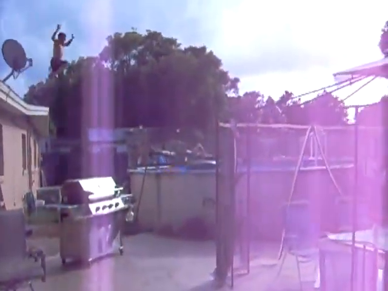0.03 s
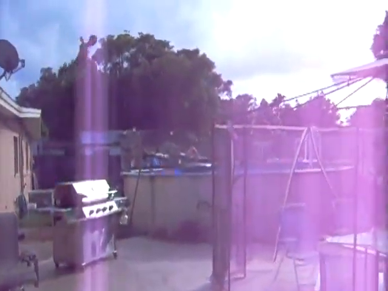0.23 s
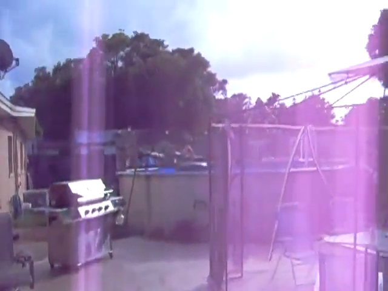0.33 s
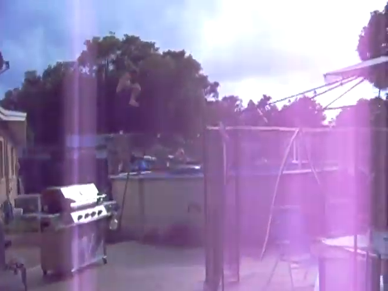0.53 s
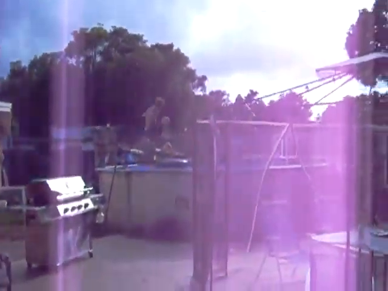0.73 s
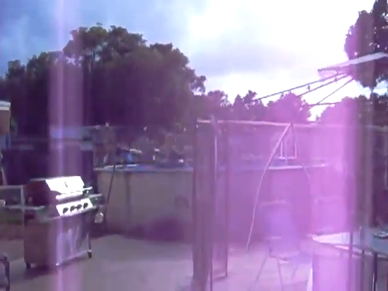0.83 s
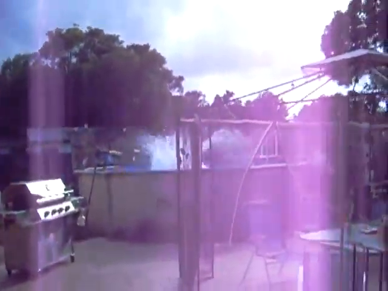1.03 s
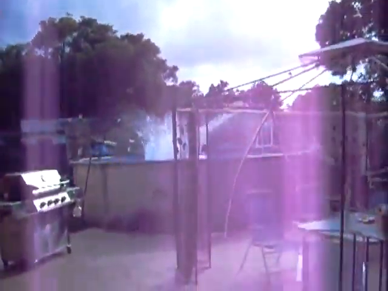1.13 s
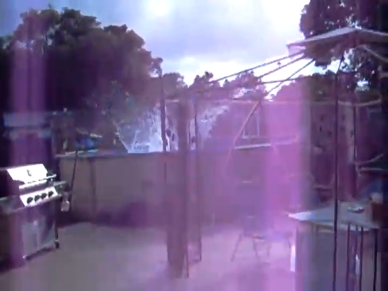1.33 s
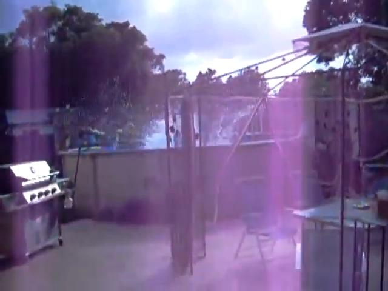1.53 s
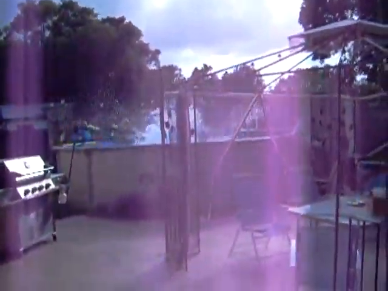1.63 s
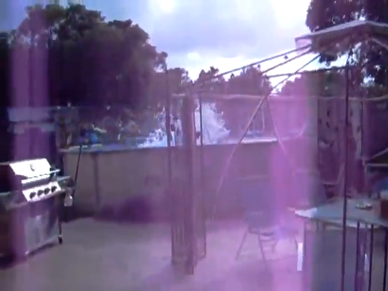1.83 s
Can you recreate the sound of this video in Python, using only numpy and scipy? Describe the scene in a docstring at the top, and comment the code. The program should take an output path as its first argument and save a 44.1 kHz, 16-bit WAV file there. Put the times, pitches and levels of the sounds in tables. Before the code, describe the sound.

Someone lands in a backyard pool with a smack, followed by pattering, churning water.

```python
"""A body hits a backyard pool after a jump from the roof, some metres from the microphone.
It smacks the surface, the air pocket behind it slams shut and throws up spray, then the water
rains back and churns, with dull echoes off the house and fence. Close up, wind bumps the
microphone, over a steady outdoor hiss and the recorder's thin whine."""
import sys
import numpy as np
from scipy import signal
from scipy.fft import rfft, irfft, next_fast_len
from scipy.io import wavfile
from scipy.ndimage import uniform_filter1d

SR = 44100
rng = np.random.default_rng(int(sys.argv[2]) if len(sys.argv) > 2 else 0)


def dump(signal):
    """Clip the signal to [-1, 1] and save it as 16-bit WAV at the path in sys.argv[1]."""
    limited = np.clip(np.atleast_2d(signal).T, -1, 1)
    pcm = np.round(limited * 32767).astype(np.int16)
    wavfile.write(sys.argv[1], SR, pcm)


N = 83790


def from_db(db):
    return 10 ** (np.asarray(db) / 20)


def unit_rms(x):
    return x / np.sqrt(np.mean(x ** 2) + 1e-20)


def seconds():
    return np.arange(N) / SR


def db_at_hz(spectrum, hz):
    """A spectrum read on a log-frequency axis."""
    corner_hz, db = np.transpose(spectrum)
    return np.interp(np.log(np.maximum(hz, 1)), np.log(corner_hz), db)


def colour(x, spectrum):
    """Causal (minimum-phase) filter with the shape of the spectrum; the result has rms 1."""
    size = next_fast_len(N, real=True) * 2
    bin_hz = np.arange(size // 2 + 1) * SR / size
    cepstrum = irfft(np.log(from_db(db_at_hz(spectrum, bin_hz))))
    cepstrum[1:size // 2] *= 2
    cepstrum[size // 2 + 1:] = 0
    response = np.exp(rfft(cepstrum))
    return unit_rms(irfft(rfft(x, size) * response)[:N])


def noise(spectrum):
    return colour(rng.standard_normal(N), spectrum)


def low_pass(x, hz):
    return signal.sosfilt(signal.butter(2, hz, fs=SR, output="sos"), x + 1e-18)


def wander(hz):
    """Random drift, mostly slower than hz; rms 1."""
    return unit_rms(low_pass(rng.standard_normal(N), hz))


def ring(clicks, hz, t60_s):
    """A unit click sets a sine of height 1 ringing."""
    decay, step = from_db(-60 / (t60_s * SR)), 2 * np.pi * hz / SR
    return signal.lfilter([0, np.sin(step)], [1, -2 * decay * np.cos(step), decay ** 2], clicks + 1e-18)


def swell(start_s, attack_s, t60_s):
    """A straight rise, then an exponential fall."""
    age = np.maximum(seconds() - start_s, 0)
    return np.minimum(age / attack_s, 1) * from_db(-60 * age / t60_s)


def evened(x, window_s):
    """Keeps the fine grain and holds the slow level at 1."""
    size = int(window_s * SR)
    power = uniform_filter1d(uniform_filter1d(x * x, size), size)
    return x / np.sqrt(np.abs(power) + 1e-9)


def grains(per_s, spread_db):
    """Random clicks, many small and a few large."""
    sizes = from_db(spread_db * np.minimum(rng.exponential(1, N), 4))
    signs = rng.choice([-1, 1], N)
    return sizes * signs * (rng.random(N) < per_s / SR)


def bubbles(spectrum, per_s, pitch_count=72, t60_cycles=43):
    """A steady cloud of bubbles of many sizes; the small, high ones die soonest."""
    births = grains(per_s, spread_db=3)
    pitch_index = rng.integers(0, pitch_count, N)
    cloud = np.zeros(N)
    for k, hz in enumerate(np.geomspace(spectrum[0][0], spectrum[-1][0], pitch_count)):
        gain = from_db(db_at_hz(spectrum, hz)) * hz
        cloud += gain * ring(births * (pitch_index == k), hz, t60_cycles / hz)
    return evened(cloud, window_s=0.03)


# Spectrum of the backyard's air and hiss: frequency_hz, relative_density_db
AIR_SPECTRUM = [(30, -1), (120, 0.5), (250, -4.5), (450, -8.5), (850, -12), (1500, -21.5), (3400, -24),
                (5300, -22.5), (6100, -10.5), (6600, -19), (7300, -13.5), (8000, -20), (9000, -24),
                (10000, -34), (11000, -40)]
def outdoor_air(level_db=-42.5):
    """The steady bed of the yard: a low wash with a thin hiss on top."""
    return from_db(level_db) * noise(AIR_SPECTRUM)


def recorder_whine(pitch_hz=7417.6, level_db=-44.5, waver_db=0.82):
    """The recorder's own high tone, wavering slightly in level."""
    amplitude = np.sqrt(2) * from_db(level_db + waver_db * wander(hz=12))
    return amplitude * np.sin(2 * np.pi * pitch_hz * seconds())


# Light breeze on the microphone: time_s, level_db
BREEZE_LEVELS = [(0, -40.5), (1.35, -40.5), (1.5, -45.5), (1.9, -44.5)]
# Gusts bumping the microphone: peak_s, half_width_s, rumble_db, flutter_db
MIC_GUSTS = [(.208, 0.01, -34.5, -47), (0.298, 0.026, -30, -47), (.38, .011, -32, -33.5),
             (.51, 0.0076, -30.5, -38), (.548, 0.014, -27, -43.5), (.595, 0.021, -31.5, -43),
             (0.681, .011, -27, -33.5), (0.742, 0.021, -27, -40.5), (0.797, .016, -26, -28),
             (0.896, .01, -32, -47), (0.961, .015, -36.5, -58), (1.08, 0.022, -33, -47),
             (1.255, .018, -30, -42), (1.318, 0.014, -28, -35.5), (1.389, 0.025, -29, -41.5)]
# Deep buffeting at the microphone: frequency_hz, relative_density_db
RUMBLE_SPECTRUM = [(12, -8.5), (30, 1.5), (60, 2), (120, -7), (200, -15.5), (320, -25.5), (700, -38),
                   (2000, -61)]
# The higher flutter of a hard gust: frequency_hz, relative_density_db
FLUTTER_SPECTRUM = [(60, -9), (110, -1), (160, 2), (240, -8.5), (400, -15), (800, -29), (2000, -51)]
def wind_on_microphone():
    """Short bell-shaped gusts over a light breeze, each with a deep rumble and a higher flutter."""
    t = seconds()
    rumble_power = from_db(np.interp(t, *np.transpose(BREEZE_LEVELS))) ** 2
    flutter_power = np.zeros(N)
    for peak_s, half_width_s, rumble_db, flutter_db in MIC_GUSTS:
        bell = np.exp(-((t - peak_s) / half_width_s) ** 2)
        rumble_power += from_db(rumble_db) ** 2 * bell
        flutter_power += from_db(flutter_db) ** 2 * bell
    rumble = np.sqrt(rumble_power) * evened(noise(RUMBLE_SPECTRUM), window_s=0.027)
    flutter = np.sqrt(flutter_power) * evened(noise(FLUTTER_SPECTRUM), window_s=0.015)
    return rumble + flutter


# Echoes off the house and fence: delay_s, gain_db
YARD_ECHOES = [(.033, -17.5), (.065, -14), (.092, -22), (.135, -20)]
def yard(direct):
    """The direct sound reaches the microphone first, then a few dull echoes."""
    t, dull = seconds(), low_pass(direct, hz=3700)
    echoes = sum(from_db(db) * np.interp(t - delay_s, t, dull, left=0) for delay_s, db in YARD_ECHOES)
    return direct + echoes


# Single bubbles that ring out of the wash: start_s, pitch_hz, level_db, t60_s
BUBBLE_NOTES = [(1.014, 248, -24, .12), (1.022, 566.7, -25, 0.24), (1.024, 638.5, -27.5, .3),
                (1.022, 779.7, -25, 0.19), (1.023, 1073, -31, 0.16), (1.098, 162, -27.5, 0.23),
                (1.52, 2540, -36.5, 0.087), (1.54, 496, -38, 0.38), (1.545, 664.6, -36.5, 0.31),
                (1.612, 6600, -37, .1), (1.815, 2850, -44, .1)]
def lone_bubbles(rise_per_s=0.21, wobble_depth=0.008):
    """Each rings one note that wobbles as it is jostled and rises a little as it nears the surface."""
    notes = np.zeros(N)
    for start_s, pitch_hz, level_db, t60_s in BUBBLE_NOTES:
        age = np.maximum(seconds() - start_s, 0)
        glide_hz = pitch_hz * (1 + rise_per_s * age + wobble_depth * wander(hz=70))
        phase = 2 * np.pi * np.cumsum(glide_hz * (age > 0)) / SR
        notes += from_db(level_db) * swell(start_s, attack_s=0.0082, t60_s=t60_s) * np.sin(phase)
    return notes


# Water falling back on the pool: time_s, churn_db, patter_db
FALLING_LEVELS = [(1.05, -61, -63), (1.2, -45, -58), (1.25, -38.5, -47.5), (1.29, -44, -48),
                  (1.39, -35, -43.5), (1.47, -43, -44), (1.56, -38.5, -41), (1.65, -41.5, -41),
                  (1.82, -45.5, -41.5), (1.9, -44.5, -42.5)]
# Bubbles in the churn: pitch_hz, relative_level_db
CHURN_SPECTRUM = [(140, -4), (190, -4), (255, -1.5), (300, -13), (350, -1.5), (410, -12), (510, 3),
                  (680, 1.5), (900, -10), (1100, -8.5), (1400, -20)]
# Drops pattering on the surface: frequency_hz, relative_density_db
PATTER_SPECTRUM = [(200, -6), (600, 3.5), (1300, 1), (2100, -3), (3200, 0), (3900, -5), (5200, -1.5),
                   (6200, 1.5), (7600, 1), (9000, -5), (11000, -14)]
def falling_water():
    """Thrown water lands: lumps make bubbles, drops patter."""
    time_s, churn_db, patter_db = np.transpose(FALLING_LEVELS)
    churn_gain = from_db(np.interp(seconds(), time_s, churn_db))
    patter_gain = from_db(np.interp(seconds(), time_s, patter_db))
    churn = bubbles(CHURN_SPECTRUM, per_s=1400)
    patter = colour(grains(per_s=4500, spread_db=2), PATTER_SPECTRUM)
    return churn_gain * churn + patter_gain * patter


# The first jet out of the pool: frequency_hz, relative_density_db
JET_SPECTRUM = [(500, -13), (1200, -4), (2000, -5), (3100, -3), (4000, -10), (5200, -6), (6150, 6.5),
                (7200, -2), (8700, -2), (11000, -13.5)]
# The sheet of spray above the pool: frequency_hz, relative_density_db
SPRAY_SPECTRUM = [(400, -14), (1200, -2.5), (1900, -4.5), (2400, -5.5), (3100, 0), (3900, -5.5), (4800, 0),
                  (5300, -3), (6150, 4), (7200, -2), (8700, -3.5), (9900, -14), (11000, -18)]
# Bubbles from the closing pocket: pitch_hz, relative_level_db
GULP_SPECTRUM = [(250, -2), (440, -15), (540, -7), (650, 4), (800, 4.5), (930, -10.5), (1120, -3.5),
                 (1500, -18)]
# The body's deep push under water: frequency_hz, relative_density_db
PLUNGE_SPECTRUM = [(30, 1), (80, -1), (170, -1.5), (260, -1.5), (350, -2), (500, -16.5), (2000, -62)]
def air_pocket_burst(start_s=1.022, attack_s=0.0034):
    """The air pocket slams shut: a brief jet, a sheet of spray, a gulp of bubbles and a deep push."""
    def fading(level_db, t60_s):
        return from_db(level_db) * swell(start_s, attack_s, t60_s)
    jet = noise(JET_SPECTRUM) * fading(level_db=-20, t60_s=0.078)
    drops = grains(per_s=14000, spread_db=3.5)
    spray = colour(drops, SPRAY_SPECTRUM) * fading(level_db=-27.5, t60_s=0.6)
    gulp = bubbles(GULP_SPECTRUM, per_s=2500) * fading(level_db=-27, t60_s=0.53)
    plunge = evened(noise(PLUNGE_SPECTRUM), window_s=0.048) * fading(level_db=-34.5, t60_s=1.0)
    return jet + spray + gulp + plunge


# Sharp thuds of the splash, some metres off: start_s, thud_drive_db, crack_db
SPLASH_THUDS = [(1.0048, -6, -19.5), (1.0064, -16.5, -22.5), (1.0224, -14.5, -28), (1.040, -24, -35)]
# The hollow ring of a thud: pitch_hz, gain_db, t60_s
THUD_MODES = [(630, -2.5, .022), (805, -12, .015), (1134, -5, 0.017)]
# The crack on top of a thud: frequency_hz, relative_density_db
CRACK_SPECTRUM = [(150, -23), (600, 18), (1500, -4.5), (2200, 1.5), (3200, -1), (5200, -6), (6200, 4),
                  (7900, -3), (11000, -10)]
def splash_thuds(contact_hz=1980, low_cut_hz=430, entry_db=-32):
    """The body's smack, its quick reflection off the ground, the air pocket's thump, a last faint thud.
    Each rings hollow with a crack; a rush follows the smack as the body tears through the surface."""
    entry_s = SPLASH_THUDS[0][0]
    noise_envelope = from_db(entry_db) * swell(entry_s, attack_s=0.002, t60_s=0.13)
    clicks = np.zeros(N)
    for start_s, thud_drive_db, crack_db in SPLASH_THUDS:
        clicks[int(start_s * SR)] -= from_db(thud_drive_db)
        noise_envelope += from_db(crack_db) * swell(start_s, attack_s=0.00027, t60_s=0.025)
    low_cut = signal.butter(2, low_cut_hz, "high", fs=SR, output="sos")
    push = signal.sosfilt(low_cut, low_pass(clicks, contact_hz))
    thud = np.zeros(N)
    for k, (pitch_hz, gain_db, t60_s) in enumerate(THUD_MODES):
        polarity = 1 if k == 0 else -1
        thud += polarity * from_db(gain_db) * ring(push, pitch_hz, t60_s)
    return thud + noise_envelope * noise(CRACK_SPECTRUM)


def scene():
    """One microphone in the yard: the splash arrives with echoes; wind, whine and air have none."""
    splash = splash_thuds() + air_pocket_burst() + falling_water() + lone_bubbles()
    mono = yard(splash) + wind_on_microphone() + recorder_whine() + outdoor_air()
    return mono[None]


def record(dry):
    """The treble is cut steeply above 11050 Hz."""
    return signal.sosfilt(signal.ellip(12, 0.1, 90, 11050, fs=SR, output="sos"), dry)


dry = scene()
out = record(dry)
dump(out)
```